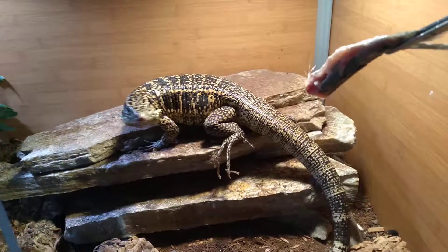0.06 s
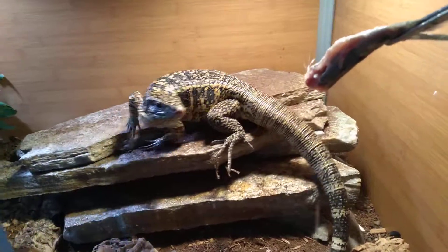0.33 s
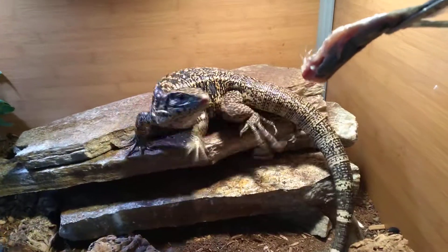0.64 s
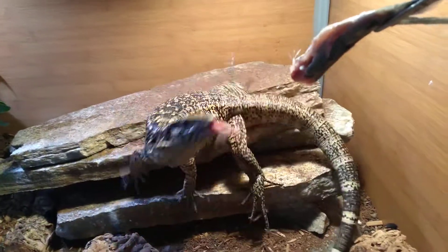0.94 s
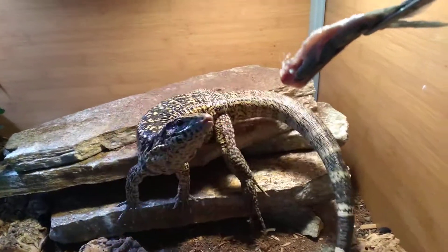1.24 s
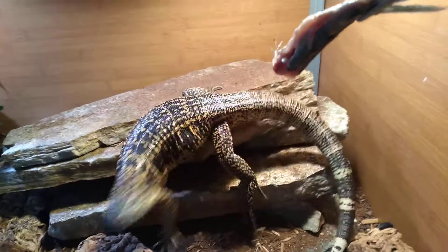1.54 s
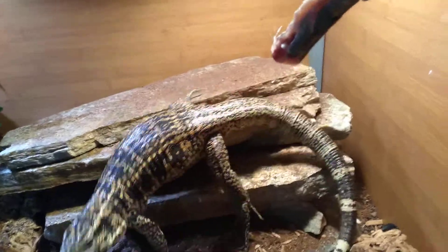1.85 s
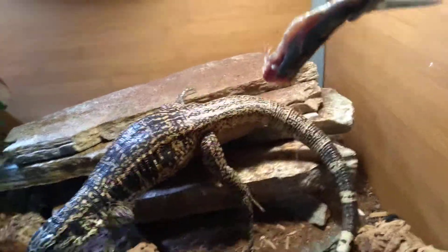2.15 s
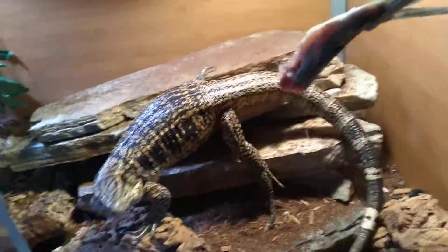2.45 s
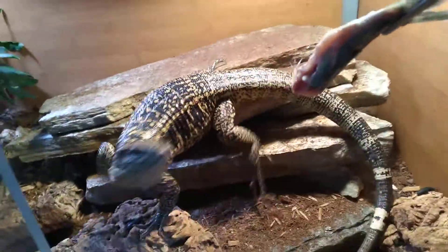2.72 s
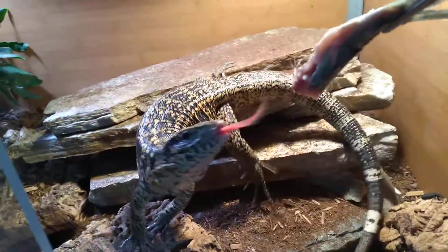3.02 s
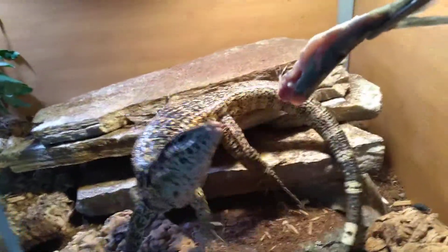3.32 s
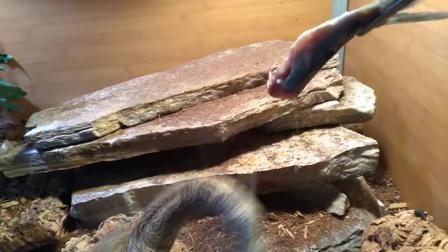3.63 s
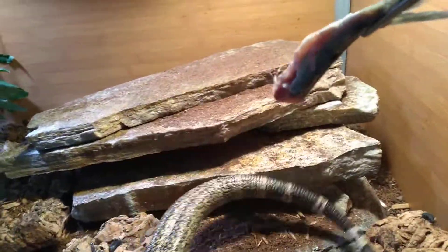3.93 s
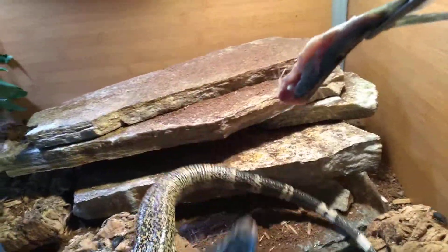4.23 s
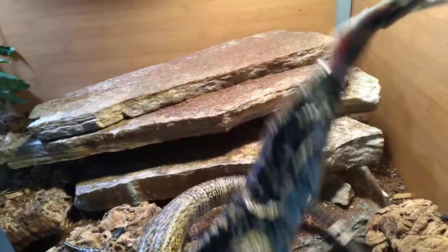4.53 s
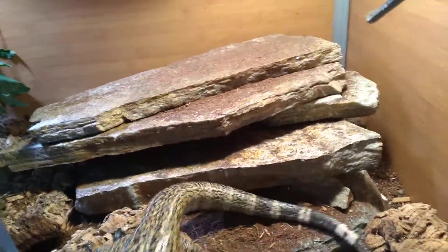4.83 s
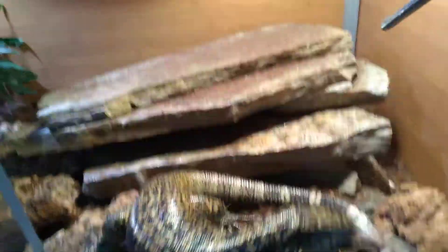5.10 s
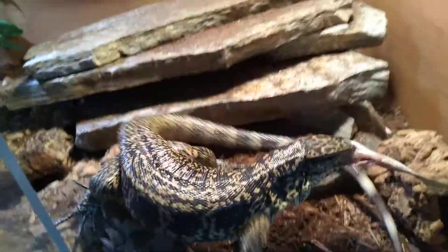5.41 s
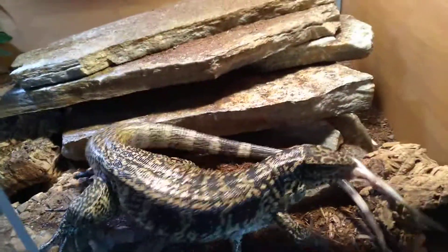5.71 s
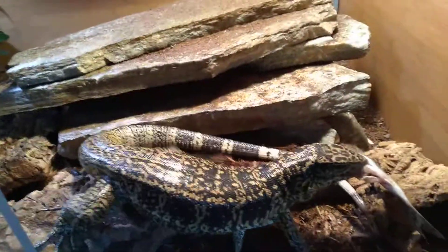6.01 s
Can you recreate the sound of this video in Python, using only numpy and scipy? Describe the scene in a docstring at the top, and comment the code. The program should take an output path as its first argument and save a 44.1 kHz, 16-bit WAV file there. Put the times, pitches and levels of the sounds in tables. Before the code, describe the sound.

Claws and scales scuff on stone in a quiet enclosure, then a lizard's lunge brings crackling grit, light thuds and rustling.

```python
"""A lizard lunges for its food

A large lizard scrambles over stacked slate in a terrarium, lunges through the bedding and seizes its
food. Claws and scales scuff the stone, grit clicks, its weight thumps the floor and something thin
rings once. Short dry brushes, low burbles and rising gurgles come and go over rustling bedding, room
air and mains hum. The faint brushes and burbles swell and fade."""
import sys
import numpy as np
from scipy import signal
from scipy.fft import rfft, irfft
from scipy.io import wavfile
from scipy.ndimage import map_coordinates

SR = 44100
rng = np.random.default_rng(int(sys.argv[2]) if len(sys.argv) > 2 else 0)


def output_pcm(signal):
    """Save a mono or channel-first signal as 16-bit PCM at the path in sys.argv[1].

    Samples are clipped to [-1, 1] before scaling.
    """
    pcm = np.clip(np.atleast_2d(signal).T, -1, 1) * 32767
    wavfile.write(sys.argv[1], SR, np.round(pcm).astype(np.int16))


N = 271656
TIME = np.arange(N) / SR

# tone of fine grit hissing: pitch_hz, relative_db
HISS_TONE = [(3000, -47), (5000, -17.5), (6500, -6.5), (7500, -2), (8700, 2), (9600, -2.5), (10500, -11),
             (13000, -21), (15500, -26.5), (17000, -83)]
# duller tone of scales rasping: pitch_hz, relative_db
RASP_TONE = [(1500, -23), (2500, -10.5), (3100, -7.5), (3700, -4.5), (4500, -2), (5300, 3), (6500, -6),
             (9000, -42)]
# drags of claws and scales: start_s, length_s, hiss_db, rasp_db, brightness_db_per_octave, attack_s
DRAGS = [(0, 0.0087, -51, -60, 2, 0.00078), (0.109, 0.016, -57, -80, 22, .004),
         (0.141, 0.013, -50.5, -69, 3, 0.011), (0.287, 0.053, -45.5, -52, 8, 0.02),
         (0.389, 0.034, -59.5, -54.5, -29, 0.0084), (0.54, 0.055, -47.5, -55.5, -15, 0.016),
         (0.709, 0.12, -60.5, -68.5, 18, 0.0062), (0.797, 0.09, -45, -55, -5, 0.0062),
         (0.908, 0.04, -43.5, -57, 2, 0.018), (0.977, 0.023, -64, -54.5, -13, 0.0058),
         (1.114, 0.032, -48, -51, -17, 0.011), (1.169, 0.013, -45.5, -73, -4, 0.0057),
         (1.227, 0.045, -38, -52.5, 0.5, 0.0063), (1.316, 0.03, -44, -56, 8, .012),
         (1.443, 0.12, -53.5, -65.5, -17, 0.0082), (1.628, 0.032, -43, -52, 2, 0.024),
         (1.697, 0.026, -41, -70, 3, 0.0028), (1.784, 0.085, -55.5, -61, -2, 0.0059),
         (1.935, 0.027, -43, -63.5, 10, 0.0022), (1.977, 0.039, -38, -50, 0, 0.015),
         (2.061, 0.047, -50, -57, -3, 0.0069), (2.148, 0.024, -43, -48, 15, 0.0023),
         (2.196, 0.061, -49.5, -57.5, -16, 0.0071), (2.298, 0.025, -45.5, -78, -10, .003),
         (2.407, 0.011, -40, -84, 5, 0.0092), (2.864, 0.04, -57, -63, -49, 0.018),
         (2.959, 0.078, -46.5, -51.5, 0, 0.061), (3.04, 0.053, -41, -52, 1, 0.039),
         (3.107, 0.028, -46, -53, 7, 0.016), (3.166, 0.025, -46, -61, 18, 0.0072),
         (3.318, 0.038, -57, -62.5, -7, 0.0031), (3.393, 0.024, -54.5, -54.5, -4, 0.0041),
         (3.474, 0.03, -42, -48, 18, 0.0035), (3.533, 0.056, -33.5, -46, 7, 0.034),
         (3.575, 0.032, -30, -42, 17, 0.0092), (3.643, 0.028, -39.5, -42.5, 15, 0.014),
         (3.685, 0.0094, -39, -40.5, 10, 0.004), (3.712, 0.033, -34, -43, 6, 0.012),
         (3.784, 0.034, -34.5, -51.5, 3, 0.0046), (3.833, 0.14, -43.5, -58.5, 4, 0.007),
         (4.214, 0.091, -48, -51.5, 1, 0.019), (4.361, 0.04, -36.5, -41.5, 5, 0.006),
         (4.441, 0.079, -41, -45, 11, 0.018), (4.58, 0.042, -63, -62.5, 2, 0.011),
         (4.641, 0.012, -49, -47, 18, 0.0048), (4.677, 0.064, -41.5, -50.5, -7, 0.022),
         (4.777, 0.014, -49.5, -52.5, 0, 0.014), (4.991, 0.045, -52, -53, -20, 0.009),
         (5.102, .032, -47.5, -71, 17, 0.0058), (5.184, 0.0074, -50, -70, 32, .005),
         (5.274, 0.037, -48, -56.5, -4, 0.0092), (5.512, 0.0047, -52, -49.5, -17, 0.0027),
         (5.54, 0.016, -33.5, -74, 4, 0.0027), (5.881, 0.025, -42.5, -53, 3, 0.0025),
         (6.143, 0.033, -45, -64, 5, 0.027)]
def scuffs(t60=0.22, lunge_t60=0.24, dig_db=-11, catch=0.24, catch_s=0.01):
    """Claws and scales slip over stone in many tiny jerks; hard drags add a lower, digging sound."""
    out, t = np.zeros((2, N)), np.arange(2 ** 14) / SR
    for start, length, hiss_db, rasp_db, bright_db, attack_s in DRAGS:
        force = np.clip((rasp_db + 54) / 14, 0, 1)
        hiss = grit(t, rate=900, spread_db=3.5, smooth_db=0, grain_s=0.0015)
        hiss = colour(hiss, HISS_TONE, bright_db, ripple_db=3.5, ripple_hz=130)
        hiss = shifting_stone(hiss, depth_db=2.5, spacing_hz=671, rate=21.2)
        rasp = grit(t, rate=700, spread_db=3.3, smooth_db=2, grain_s=0.0012)
        rasp = colour(rasp, RASP_TONE, ripple_db=3, ripple_hz=130)
        rasp = shifting_stone(rasp, depth_db=5, spacing_hz=300, rate=55)
        dig = grit(t, rate=400, spread_db=3, smooth_db=0, grain_s=0.0023)
        rasp += force * undb(dig_db) * unit(band(dig, hz=2700, octaves=1.9, order=2))
        sound = hiss * undb(hiss_db) * sides(-0.37) + rasp * undb(rasp_db) * sides(-7.5)
        sound *= undb(1.1 * wander(170)[:len(t)])  # claws catch and let go
        sound *= 1 + catch * np.exp(-t / catch_s)  # the first catch bites hardest
        add(out, start, sound * stroke(t, length, attack_s, t60 + force * (lunge_t60 - t60)))
    return out


# claw tips and grit snapping: start_s, snap_db, knock_above_snap_db, width_octaves, left_minus_right_db
GRIT_SNAPS = [(.932, -28, -23, 0.74, -10.5), (1.364, -31, -25, 0.49, 1), (1.6527, -21.5, -29, 0.13, -8),
              (2.0509, -26.5, -22, 0.35, 0), (2.1473, -19.5, -5, 0.23, -1), (3.689, -23, -8, 0.3, 0),
              (3.694, -20.5, -13, 0.17, -9), (3.7258, -11.5, -15, 1, 1), (3.727, -13.5, -7, 0.37, -3),
              (3.7322, -21, -20, 0.26, -5), (3.791, -23.5, -3.5, .4, -1), (3.7963, -18.5, -15, 0.33, -3),
              (3.8022, -23, -7, 0.82, -1), (3.8059, -5, -36, 1.02, -3.5), (3.8096, -13, -29, 0.2, 11),
              (3.8152, -23, -14, 0.26, 1), (3.936, -15.5, -17, .7, -2), (4.0205, -27, -31, 0.6, 3),
              (4.2605, -26, -16, .3, 2), (4.3635, -21.5, -14, 0.2, 2), (4.3667, -25, -10, 0.21, -2),
              (4.3728, -18.5, -25, 0.089, -2), (4.383, -20, -13, 0.11, -3), (4.3872, -17, -12, 0.23, 0),
              (4.3907, -19, -5, 0.16, 3), (4.394, -26, -4, 0.26, -2), (4.404, -17, -4.5, 0.14, 1),
              (4.411, -23.5, -2, 0.29, 5), (4.419, -20.5, -6, 0.24, 0), (4.6348, -15, -21, 0.52, 0),
              (4.74, -18.5, -6, 0.1, -4.5), (5.516, -48.5, 12, 0.55, 5)]
def clicks(snap_hz=8760, knock_hz=4380, knock_octaves=0.43, tail_s=0.0095, tail_db=-17):
    """A grain gives way: a high snap over a lower knock, then scatter from nearby stone and glass."""
    out, t = np.zeros((2, N)), np.arange(SR // 16) / SR
    for start, db, knock_db, octaves, pan_db in GRIT_SNAPS:
        ring_s = np.interp(db, [-18, -10], [0.00023, 0.00035])  # hard cracks last longer
        shape = t / ring_s * np.exp(1 - t / ring_s) + undb(tail_db) * np.exp(-t / tail_s)
        snap = (snap_hz, octaves, undb(db) * sides(pan_db))
        knock = (knock_hz, knock_octaves, undb(db + knock_db) * sides(-7))
        for hz, width, gain in snap, knock:
            burst = band(rng.choice([-1., 1.], (2, len(t))) * shape, hz, width, order=2)
            add(out, start, burst / np.abs(burst).max(axis=1, keepdims=True) * gain)
    return out


# the notes the floor rings with: pitch_hz, relative_db, fade_s
FLOOR_NOTES = [(192.4, -11, 0.1), (288, 1.5, 0.077), (359, -2, 0.079), (437, 6, 0.05), (548, -2, 0.056),
               (690, 13, 0.0079), (866, 3, 0.082), (1330, 12.5, 0.013), (1650, 4, 0.043)]
# body and feet landing: start_s, peak_db, cutoff_hz
LANDINGS = [(3.651, -36.5, 250), (3.687, -38, 1400), (3.699, -30, 243), (3.727, -36, 900),
            (3.745, -35, 520), (3.794, -49.5, 350), (3.935, -22.5, 2120), (3.939, -26, 1800),
            (3.945, -32, 600), (3.966, -40, 1300), (4.379, -48.5, 500), (4.415, -49, 500), (4.74, -59, 296)]
def thumps(crunch_s=0.017, spread=0.68):
    """Landings ring the floor and crunch the bedding; soft ones lose the higher notes."""
    out, t = np.zeros((2, N)), np.arange(SR // 4) / SR
    for start, db, cutoff_hz in LANDINGS:
        floor = 0
        for hz, note_db, t60 in FLOOR_NOTES:
            # higher notes reach left and right further out of step
            phase = rng.uniform(0, 2 * np.pi) + spread * hz / 1000 * np.array([[1], [-1]])
            note = np.sin(2 * np.pi * hz * rng.normal(1, 0.031) * t + phase)
            floor += undb(note_db) * fade(t, t60) * note
        noise = rng.standard_normal(len(t)) + .5 * rng.standard_normal((2, len(t)))
        crunch = 1.3 * unit(band(noise, hz=400, octaves=3.4)) * np.exp(-t / crunch_s)
        blow = pass_filter(floor + crunch, "low", cutoff_hz, order=2)
        add(out, start, blow / np.abs(blow).max() * undb(db))
    return out


def thin_ring(start_s=3.59, swell_s=0.012):
    """The lunge rubs a thin object: two high tones build up, then ring out."""
    t = np.maximum(TIME - start_s, 0)
    ringing_s = np.maximum(t - swell_s, 0)
    lower = undb(-38.5) * fade(ringing_s, t60=0.16) * np.sin(2 * np.pi * 3143 * t)
    upper = undb(-36) * fade(ringing_s, t60=0.081) * np.sin(2 * np.pi * 4310 * t)
    return np.minimum(t / swell_s, 1) * (lower + upper)


# the clearest dry brushes: start_s, pitch_hz, relative_db, length_s
CLEAR_BRUSHES = [(.144, 938, -54.5, 0.017), (.343, 1100, -57, 0.045), (.395, 2700, -64, 0.015),
                 (.541, 2835, -54.5, 0.011), (.692, 4010, -58.5, 0.0082), (1.04, 2710, -60.5, 0.015),
                  (1.29, 1277, -51, 0.014), (1.345, 1013, -57, 0.026), (1.48, 2536, -59, 0.025),
                 (1.571, 2505, -54.5, 0.028), (1.771, 1220, -59, 0.099), (1.847, 2640, -58, 0.021),
                 (1.971, 2950, -52.5, 0.011), (2.0, 848, -52.5, 0.016), (2.066, 1402, -54, 0.017),
                 (2.296, 2600, -55, 0.0056), (2.565, 2375, -63, 0.021), (2.722, 3670, -48.5, 0.0086),
                 (2.802, 4565, -50, 0.01), (3.106, 2084, -59, 0.025), (3.205, 3960, -47, 0.0097),
                 (3.324, 910, -51, 0.0078), (4.092, 4380, -51.5, 0.025), (4.198, 2780, -57.5, 0.038),
                 (4.196, 900, -56.5, 0.033), (4.204, 1358, -47.5, 0.026), (4.485, 1360, -55.5, 0.04),
                 (4.833, 4680, -49.5, 0.02), (4.991, 3164, -55, 0.021), (5.04, 1068, -55, 0.026),
                 (5.045, 2276, -63.5, 0.029), (5.232, 4670, -49.5, 0.02), (5.374, 1258, -51, 0.019),
                 (5.652, 4230, -61, 0.014), (5.927, 3180, -57.5, 0.017)]
def brushes(gain_db=2, attack_cycles=15, t60=0.18, faint_s=0.0235, follow=0.88):
    """Light, dry brushes: low ones rise most; high ones start sharply and trail more rustle."""
    out, t = np.zeros((2, N)), np.arange(2 ** 13) / SR
    faint = [(start, 830 * 3.6 ** pitch, -75 - 2 * pitch + follow * swell_db + 7 * size, faint_s)
             for start, swell_db, pitch, size in chance_events(count=100)]
    for start, hz, db, length in list(CLEAR_BRUSHES) + faint:
        rise = np.interp(hz, [1000, 4000], [6, 1.5])
        noise = pitched_noise(t, hz, width=0.33, rise=rise, length=length, lag_s=0.00045, diffuse=1)
        noise = colour(noise, ripple_db=7.0, ripple_hz=91.3)
        rustle = unit(band(rng.standard_normal((2, len(t))), hz, octaves=0.7, order=2)) * hz / 7000
        sound = shaped(noise, stroke(t, length, attack_cycles / hz, t60))
        sound += rustle * stroke(t, 2 * length, 2 * length, t60)
        add(out, start, sound * undb(db + gain_db) * sides_by_pitch(hz))
    return out


# soft rising gurgles: start_s, length_s, rough_start_hz, rough_end_hz, relative_db
GURGLES = [(0.749, .075, 780, 1138, -55), (2.395, 0.091, 800, 1250, -59), (2.91, 0.077, 700, 1150, -54),
           (3.389, 0.046, 820, 1100, -52.5), (4.774, 0.067, 610, 790, -63.5), (4.904, .05, 848, 1450, -56),
           (2.49, 0.059, 1945, 2400, -65.5), (5.748, 0.1, 1750, 2440, -60), (6.039, 0.0498, 700, 1108, -50),
           (6.096, 0.076, 1450, 2160, -60.5)]
def gurgles(gain_db=2, swell=0.34, t60=0.12, width=.4, rustle_db=-8):
    """A narrow band of sound swells and climbs, breaking into little drips inside a wider rustle."""
    out, t = np.zeros((2, N)), np.arange(2 ** 14) / SR
    for start, length, first_hz, last_hz, db in GURGLES:
        hz = np.sqrt(first_hz * last_hz)
        rise = np.log2(last_hz / first_hz) / length
        noise = pitched_noise(t, hz, width, rise, length / 2, lag_s=0.00044, diffuse=0.92, pure=0.41)
        drips = colour(noise, ripple_db=4.5, ripple_hz=110) * undb(3.5 * wander(70)[:len(t)])
        rustle = unit(band(rng.standard_normal((2, len(t))), hz, octaves=0.95, order=3))
        sound = shaped(drips + undb(rustle_db) * rustle, stroke(t, length, swell * length, t60))
        add(out, start, sound * undb(db + gain_db) * sides_by_pitch(hz))
    return out


# the clearest low plops: middle_s, pitch_hz, relative_db
PLOPS = [(.066, 608, -50), (.162, 560, -49), (.325, 571, -46), (.355, 590, -47.5), (.393, 579, -51),
         (.456, 582, -47), (.88, 568, -52), (.966, 620, -47), (1.006, 631, -46.5), (1.135, 581, -53.5),
         (1.305, 567, -51.5), (1.36, 542, -44), (1.432, 525, -41.5), (1.94, 557, -53.5), (2.01, 605, -43),
         (2.14, 600, -51.5), (2.188, 556, -46.5), (2.232, 607, -48), (2.4, 597, -44.5), (2.752, 508, -50.5),
         (2.81, 630, -49.5), (2.921, 600.4, -43.5), (3.129, 594, -46.5), (3.503, 609, -44.5),
         (3.58, 652, -51.5), (4.204, 606, -44.5), (4.274, 609, -45.5), (4.318, 674, -47), (4.5, 570, -45),
         (4.781, 624, -52.5), (4.89, 605, -51.5), (4.925, 598, -48), (5.025, 633, -53.5),
         (5.134, 533, -51.5), (5.26, 592, -43.5), (5.831, 591, -46.5), (5.912, 563, -51.5),
         (5.945, 609, -54), (6.06, 575, -53)]
def burbles(gain_db=-1, length=0.018, t60=0.12, edge_db=-13, hollow_hz=622, follow=0.56, lag_s=0.00047):
    """Hollow plops with a rough upper edge, run together by fainter ones and a wavering murmur."""
    out, t = np.zeros((2, N)), np.arange(2 ** 13) / SR
    faint = [(middle, 540 * 1.55 ** (pitch ** 2), -62 + follow * swell_db + 8 * size)
             for middle, swell_db, pitch, size in chance_events(count=55)]
    for middle, hz, db in list(PLOPS) + faint:
        rise = np.interp(hz, [560, 610], [-5, 4])  # low plops sag, high ones lift
        note = pitched_noise(t, hz, width=0.23, rise=rise, length=length, lag_s=lag_s,
                             diffuse=0.8, pure=2)
        edge = pitched_noise(t, hz * 1.4, width=0.8, rise=0.9, length=length, lag_s=lag_s, diffuse=1)
        plop = shaped(unit(note) + undb(edge_db) * unit(edge), stroke(t, length, 0.013, t60))
        add(out, middle - length, plop * undb(db + gain_db))
    murmur = pitched_noise(TIME, hollow_hz, width=0.27, rise=0, length=length, lag_s=lag_s, diffuse=0.17)
    out += unit(murmur) * undb(-70 + follow * slow_swell(TIME) + 4 * wander(14))
    out += undb(-5) * band(out, hollow_hz, octaves=0.024)  # one shared hollow ring
    return pass_filter(out, "high", 410, order=8)


# bands of rustle from loose bedding: pitch_hz, relative_db
BEDDING_BANDS = [(1900, -77), (2700, -80), (3900, -75.5), (5200, -70), (7000, -76), (8800, -71.5)]
def bedding(swell_db=3, flicker_db=4, follow=.25):
    """Disturbed bedding keeps up a faint rustle; its bands swell together and flicker alone."""
    shared_db = swell_db * wander(10) + follow * slow_swell(TIME)
    out = 0
    for hz, db in BEDDING_BANDS:
        grains = grit(TIME, rate=300, spread_db=1.5, smooth_db=-2, grain_s=0.0018)
        rustle = band(grains, hz, octaves=0.37, order=3)
        out += unit(rustle * undb(shared_db + flicker_db * wander(22))) * undb(db)
    return out * sides(-0.062)


# tone of the quiet room: pitch_hz, relative_db
AIR_TONE = [(25, -4), (60, -3), (100, -3), (180, -1.5), (300, -13.5), (420, -6), (600, -15), (900, -1),
            (1600, -22), (4000, -29), (8800, -4.5), (12000, -18.5), (16000, -23)]
def room_air(level_db=-66.5, waver_db=1.5):
    """Faint, wavering air noise, most alike left and right in the bass."""
    shared, apart = rng.standard_normal((2, N))
    apart = apart - 0.7 * pass_filter(apart, "low", 700, order=1)
    gain = undb(level_db + waver_db * wander(9))
    return colour(shared + apart * np.array([[1], [-1]]), AIR_TONE) * gain


# tones of the electrical hum: pitch_hz, level_db
HUM_TONES = [(119.8, -73.5), (348, -85.5)]
def mains_hum():
    """Mains power hums steadily, louder on the left."""
    hum = sum(undb(db) * np.sqrt(2) * np.sin(2 * np.pi * hz * TIME) for hz, db in HUM_TONES)
    return hum * sides(6.9)


# swell of the faint background brushes, burbles and rustle: time_s, swell_db
SWELL_CURVE = [(0, -2), (.4, 19), (.68, -24.5), (.9, -8), (1.4, 9), (2.2, 5.5), (2.55, -6.5), (2.85, 5.5),
               (3.1, 7.5), (3.35, -14), (3.75, 2), (4.08, 1.5), (4.5, -13), (5.05, 1.5), (5.65, -5.5),
               (6.16, -1)]
def slow_swell(t):
    """The faint sounds swell and fade together; each takes its `follow` share of this curve."""
    return np.interp(t, *np.transpose(SWELL_CURVE))


def chance_events(count):
    """Random moments spread through the scene: time_s, swell_db, pitch (0-1), size (0-1)."""
    slot, pitch, size = rng.random((count, 3)).T
    start = (np.arange(count) + slot) / count * N / SR
    return zip(start, slow_swell(start), pitch, size)


def grit(t, rate, spread_db, smooth_db, grain_s):
    """Tiny slips of uneven size, about `rate` a second, over smooth noise; left and right differ."""
    slips = rng.random(len(t)) < rate / SR
    sizes = undb(spread_db * np.minimum(rng.exponential(size=len(t)), 4))
    power = signal.lfilter([1], [1, -np.exp(-2 / (grain_s * SR))], (slips * sizes) ** 2) + 1e-9
    return np.sqrt(power / power.mean() + undb(2 * smooth_db)) * rng.standard_normal((2, len(t)))


def shifting_stone(x, depth_db, spacing_hz, rate):
    """The pitches the stone favours keep changing as a claw moves across it."""
    hz, t, spectrum = signal.stft(x, SR, nperseg=256)
    bumps = rng.standard_normal((256, 128))
    positions = np.array(np.meshgrid(hz / spacing_hz, t * rate, indexing="ij"))
    gain_db = depth_db * map_coordinates(bumps, positions, order=1, mode="mirror")
    return unit(signal.istft(spectrum * undb(gain_db), SR)[1][:, :x.shape[-1]])


def pitched_noise(t, hz, width, rise, length, lag_s, diffuse, pure=0):
    """Noise around one pitch, gliding `rise` octaves a second; `pure` adds a clean tone."""
    noise = rng.standard_normal((3, 2 * len(t))) + 1j * rng.standard_normal((3, 2 * len(t)))
    noise = pass_filter(noise, "low", width * hz / 2, order=4)[:, len(t):]
    glide_hz = hz * 2 ** (rise * (np.minimum(t, 2 * length) - 0.76 * length))
    phase = 2 * np.pi * np.cumsum(glide_hz) / SR
    left_first = np.exp(1j * np.pi * hz * lag_s * np.array([[1], [-1]]))
    direct = (noise[0] + pure * noise.std()) * left_first
    return ((direct + diffuse * noise[1:]) * np.exp(1j * phase)).real


def colour(x, points=((100, 0), (1000, 0)), tilt_db=0, ripple_db=0, ripple_hz=300):
    """Shape a tone with (pitch_hz, relative_db) points, a treble tilt and random peaks and dips."""
    hz, db = np.transpose(points)
    f = np.maximum(np.fft.rfftfreq(x.shape[-1], 1 / SR), 1)
    gain_db = np.interp(np.log(f), np.log(hz), db) + tilt_db * np.log2(np.clip(f, 6000, 13000) / 6000)
    gain_db += ripple_db * np.interp(f / ripple_hz, np.arange(512), rng.standard_normal(size=512))
    gain = undb(gain_db) * np.minimum(f / hz[0], 1) ** 2  # falls away below the first point
    return unit(irfft(rfft(x) * gain, x.shape[-1]))


def band(x, hz, octaves, order=1):
    """Keep a range of pitches around hz."""
    edges = np.clip(hz * 2 ** (np.array([-.5, .5]) * octaves), [10, 20], [SR * .4, SR * .48])
    return pass_filter(x, "band", edges, order)


def pass_filter(x, kind, hz, order):
    """Let the lows, the highs or a band through; a higher order cuts more steeply."""
    return signal.sosfilt(signal.butter(order, hz, kind, fs=SR, output="sos"), x)


def stroke(t, length, attack_s, t60):
    """A sound builds up, holds, and dies away in the enclosure."""
    return np.clip(t / attack_s, 0, 1) * fade(np.clip(t - length, 0, 1), t60)


def fade(t, t60):
    """Die away by 60 dB every t60 seconds."""
    return np.exp(-np.log(1000) * t / t60)


def shaped(x, shape):
    """Apply a loudness curve so that the held part has an average level near 1."""
    return x * shape * np.sqrt(np.sum(shape ** 2) / np.mean(np.sum((x * shape) ** 2, axis=1)))


def wander(rate):
    """Drift to a new random value `rate` times a second."""
    knots = rng.standard_normal(int(N / SR * rate) + 2)
    return np.interp(TIME * rate, np.arange(len(knots)), knots)


def sides_by_pitch(hz):
    """Left and right gains of a soft sound: middle pitches lie furthest right."""
    return sides(np.interp(hz, [1200, 2400, 4500], [0, -10, -2]))


def sides(pan_db):
    """Left and right gains; positive is louder on the left."""
    return undb(np.array([[pan_db], [-pan_db]]) / 2)


def undb(db):
    """Decibels to gain."""
    return 10 ** (np.asarray(db) / 20)


def unit(x):
    """Scale to an average (rms) level of 1."""
    return x / np.sqrt(np.mean(x ** 2))


def add(out, start, x):
    """Mix a sound in at `start` seconds."""
    i = int(start * SR)
    x, i = x[..., max(-i, 0):], max(i, 0)
    out[:, i:i + x.shape[-1]] += x[..., :max(N - i, 0)]


def scene():
    """The lizard's movements over the background."""
    lizard = scuffs() + clicks() + thumps() + thin_ring()
    return lizard + brushes() + gurgles() + burbles() + bedding() + room_air() + mains_hum()


def record(dry, bass_hz=45, top_hz=16300):
    """The recorder cuts the deep bass and the highest treble."""
    dry = pass_filter(dry, "high", bass_hz, order=3)
    return signal.sosfilt(signal.ellip(8, .2, 70, top_hz, fs=SR, output="sos"), dry)


dry = scene()
out = record(dry)
output_pcm(out)
```